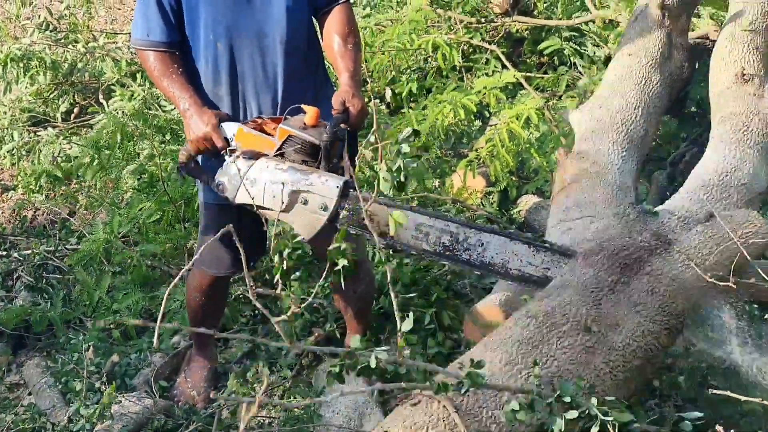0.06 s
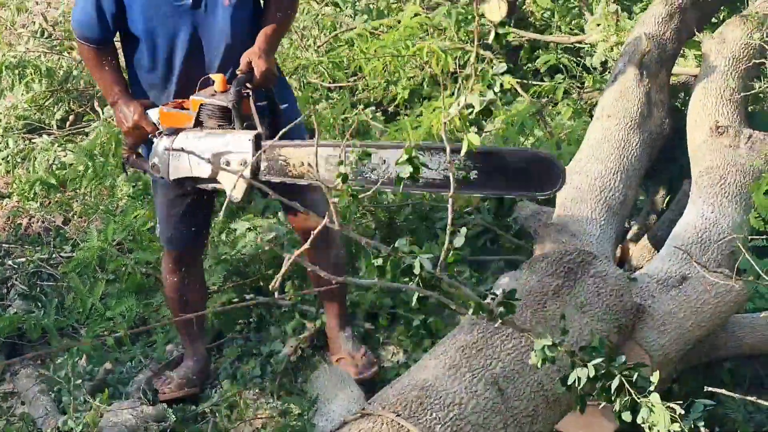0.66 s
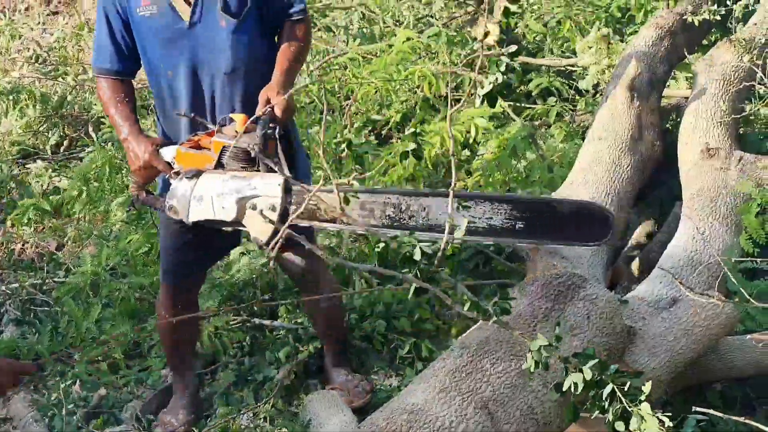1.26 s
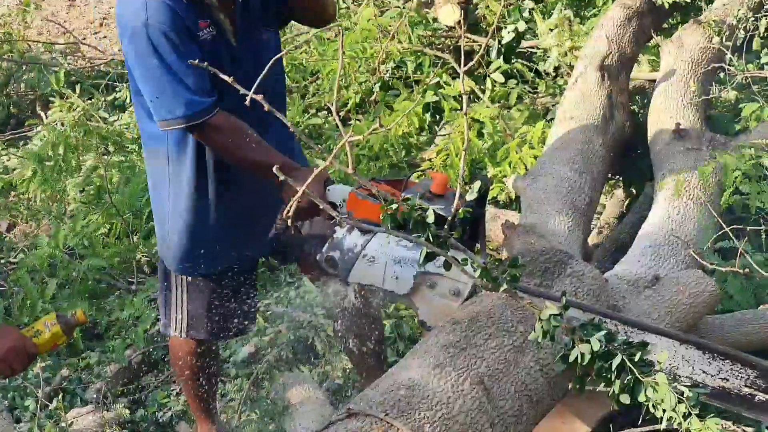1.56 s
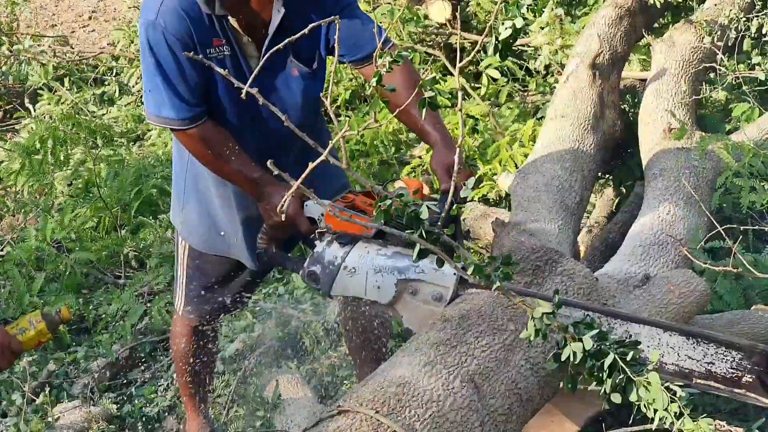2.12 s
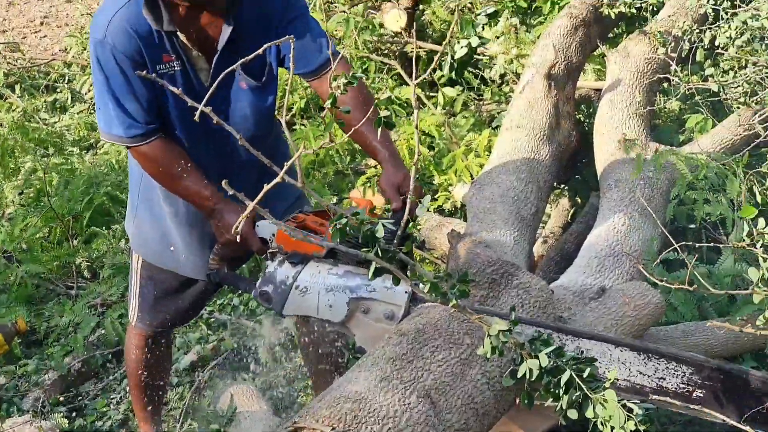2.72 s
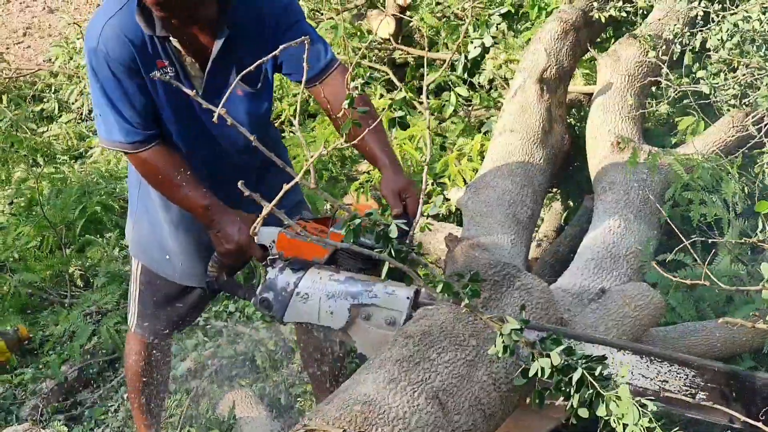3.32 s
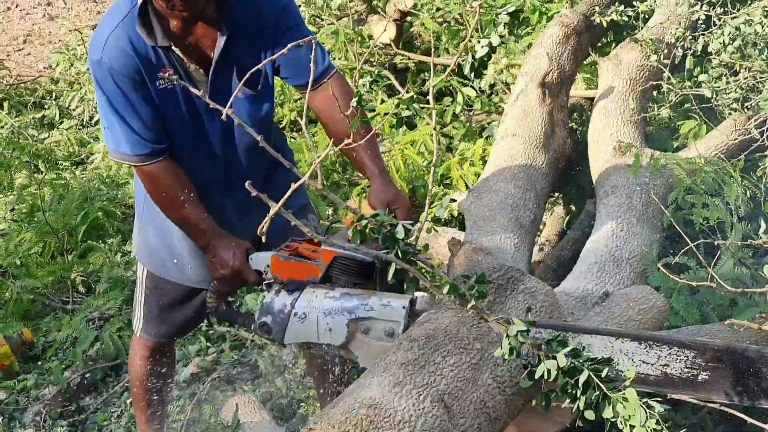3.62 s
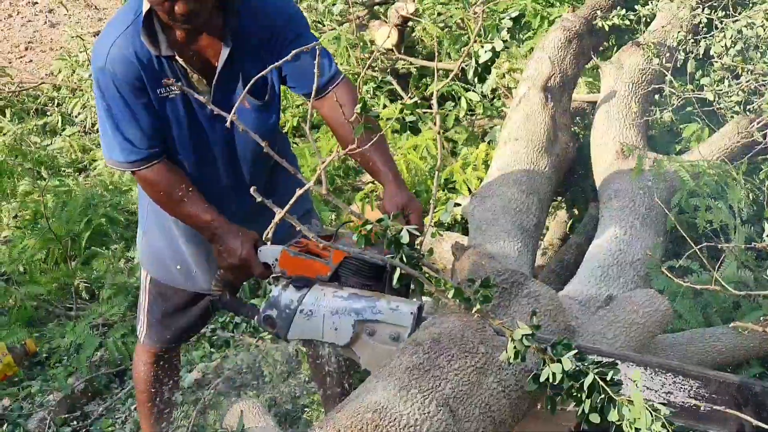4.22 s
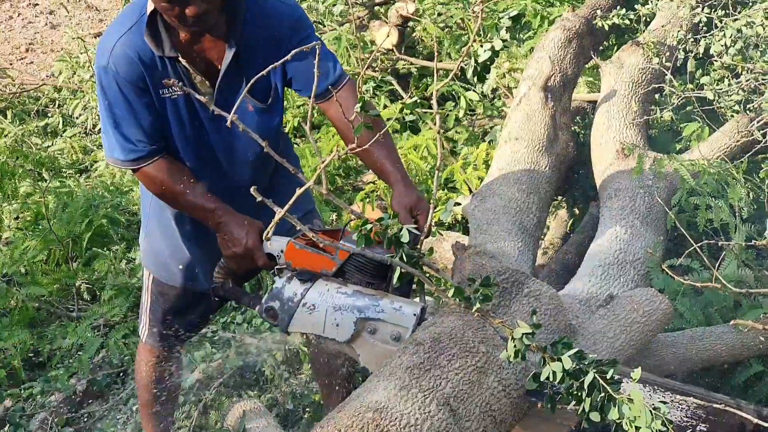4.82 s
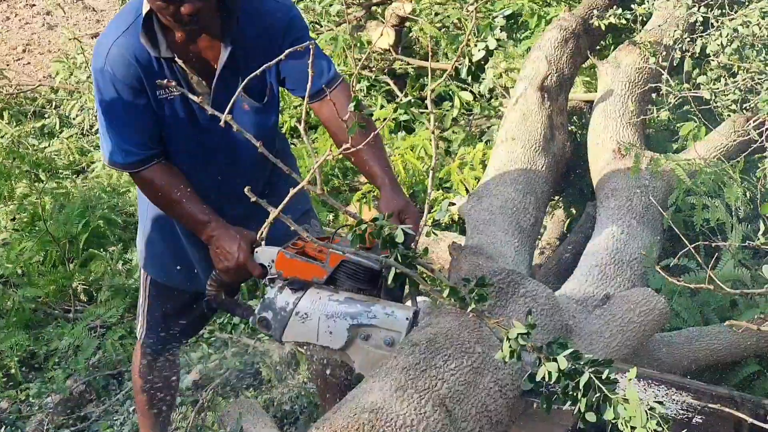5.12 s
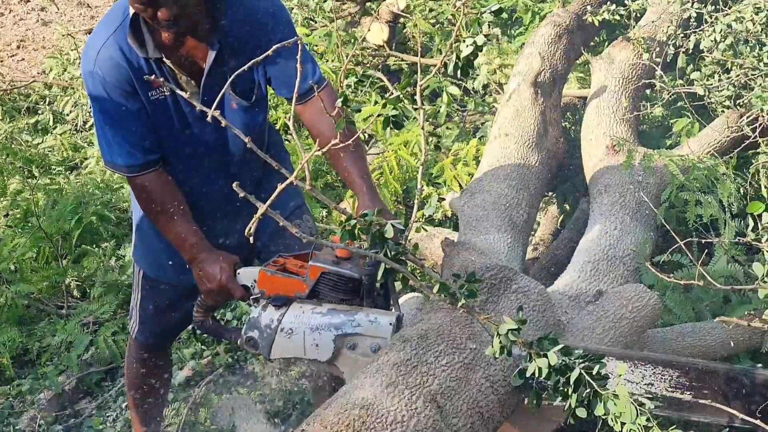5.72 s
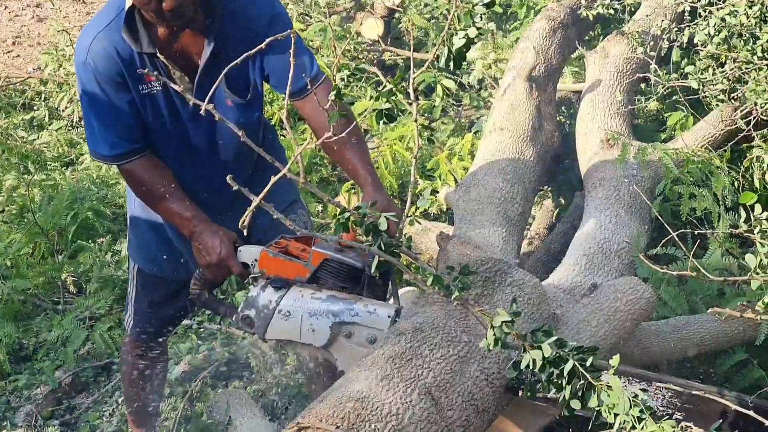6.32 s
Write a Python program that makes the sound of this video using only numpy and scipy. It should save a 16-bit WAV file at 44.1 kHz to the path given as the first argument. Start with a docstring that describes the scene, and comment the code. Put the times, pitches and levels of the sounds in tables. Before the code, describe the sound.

A close two-stroke chainsaw putters and rattles off the throttle, then roars into a tree trunk, sagging and recovering as its teeth rasp.

```python
"""A two-stroke chainsaw, close by outdoors. It leaves one cut and coasts: the engine putters, the casing
clatters, the slack chain slaps the bar. One blip of throttle, then the slowing links zing. At 1.7 s the
throttle opens and the teeth rasp and hiss into a trunk. Firing pulses make the muffler bark and ring;
the engine sags and recovers, the air box honks with each push. The chain scrapes the side of the cut,
its links squeal in spells, and at 4 s the binding bar groans once."""
import sys
import numpy as np
from scipy import signal
from scipy.fft import rfft, irfft, next_fast_len
from scipy.io import wavfile
from scipy.ndimage import map_coordinates

SR = 44100
rng = np.random.default_rng(int(sys.argv[2]) if len(sys.argv) > 2 else 0)


def generate_wav(sig):
    """Save sig (samples, or channels by samples) to the path in sys.argv[1] as 16-bit PCM at SR."""
    pcm = np.round(np.clip(np.atleast_2d(sig).T, -1, 1) * 32767).astype(np.int16)
    wavfile.write(sys.argv[1], SR, pcm)


N = 284886
TIME_S = np.arange(N) / SR


def amp(db):
    """Decibels to gain."""
    return 10 ** (np.asarray(db) / 20)


def unit(x):
    """Scale to rms 1."""
    return x / np.sqrt(np.mean(x ** 2) + 1e-20)


def along(points, hz):
    """Interpolate (freq_hz, value) points on a log axis."""
    freqs_hz, values = np.transpose(points)
    return np.interp(np.log(hz + 1), np.log(freqs_hz + 1), values)


def curves(rows):
    """One value per sample for each column after time_s."""
    times_s, *columns = np.transpose(rows)
    return [np.interp(TIME_S, times_s, column) for column in columns]


def wobble(rate_hz):
    """Smooth random curve, rate_hz knots a second."""
    knots = rng.standard_normal(int(N * rate_hz / SR) + 4)
    return map_coordinates(knots, [TIME_S * rate_hz])


def ramp(centre_s, edge_s):
    """Linear rise from 0 to 1 within edge_s."""
    return np.clip((TIME_S - centre_s) / edge_s + .5, 0, 1)


def held(start_s, end_s, edge_s):
    """Attack, hold, release."""
    return ramp(start_s, edge_s) * (1 - ramp(end_s, edge_s))


def filtered(x, response):
    """x times a complex response of frequency."""
    size = 2 * next_fast_len(N // 2 + SR // 4)
    return irfft(rfft(x, size) * response(np.fft.rfftfreq(size, 1 / SR)), size)[..., :N]


def grounded(x, echo, delay_s=.004022):
    """x combed by its echo off the ground."""
    return filtered(x, lambda hz: 1 + echo * np.exp(-2j * np.pi * hz * delay_s)) / np.hypot(1, echo)


def coloured(x, spectrum, size=8192):
    """x through a minimum-phase body of (freq_hz, gain_db) points, at rms 1."""
    closed = [(spectrum[0][0] / 2, -80), *spectrum, (spectrum[-1][0] * 2, -80)]
    cepstrum = irfft(np.log(amp(along(closed, np.fft.rfftfreq(size, 1 / SR)))))
    body = irfft(np.exp(rfft(2 * cepstrum[:size // 2], size) - cepstrum[0]))[:size // 2]
    return unit(signal.oaconvolve(np.atleast_2d(x), body[None], axes=1)[:, :N])


def ringing(x, modes):
    """x through (freq_hz, width_hz, gain_db) resonances, at rms 1."""
    t = TIME_S[:SR // 20]
    ring = sum((-1) ** k * amp(db) * width * np.exp(-np.pi * width * t) * np.cos(2 * np.pi * hz * t)
               for k, (hz, width, db) in enumerate(modes))
    return unit(signal.oaconvolve(x, ring[None], axes=1)[:, :N])


def narrow(x, hz, half_width_hz):
    """Noise x as a narrow band around a gliding pitch, at rms 1."""
    band = signal.lfilter(*signal.butter(2, half_width_hz, fs=SR), x)
    return unit(band * np.cos(2 * np.pi * np.cumsum(hz) / SR))


def noise(alike=1.0):
    """Stereo white noise with correlation alike."""
    a, b = rng.standard_normal((2, N))
    return np.array([a, alike * a + np.sqrt(1 - alike ** 2) * b])


def pulses(turns, angle_turns, jitter_turns, scatter_db):
    """One pulse a turn at this crank angle, uneven in time and size."""
    count = np.arange(1, int(turns[-1]))
    timing, strength = rng.standard_normal((len(count), 2)).T
    at = np.interp(count + angle_turns + jitter_turns * timing, turns, np.arange(N))
    size, whole, part = amp(scatter_db * strength), at.astype(int), at % 1
    split = np.bincount(whole, size * (1 - part), N + 1)[:N]
    return split + np.bincount(whole + 1, size * part, N + 1)[:N]


def puffs(turns, decay_turns):
    """Gate that opens once a turn and decays, at rms 1."""
    return unit(np.exp(-(turns % 1) / decay_turns))


def harmonic(turns, order):
    """Sinusoid at a multiple of the crank speed, at rms 1."""
    return np.sqrt(2) * np.cos(2 * np.pi * order * turns)


# Crank speed, coasting with one blip: time_s, speed_rps
COAST_SPEED = [(0, 118), (.1, 102), (.3, 92), (.55, 90), (.66, 113), (.77, 122), (1.05, 115), (1.3, 105),
               (1.62, 95)]
# Crank speed under load: time_s, speed_rps
CUT_SPEED = [(1.69, 94.7), (1.99, 87.4), (2.06, 88.3), (2.23, 96.5), (2.35, 99.4), (2.43, 98.9),
             (2.53, 90.5), (2.81, 87.5), (3.08, 86.1), (3.4, 89.2), (3.71, 87.6), (3.81, 89.2),
             (3.92, 88.8), (4.08, 85.9), (4.29, 85.9), (4.39, 84.3), (4.55, 86.1), (4.76, 84.7),
             (4.9, 79.6), (5.05, 79.6), (5.26, 87.3), (5.48, 88.5), (5.52, 90.0), (5.79, 93.7),
             (5.87, 92.9), (6.46, 95.7)]

def crankshaft(waver=.003):
    """Nominal speed, and turns made at a slightly wavering speed."""
    speed_rps, = curves([*COAST_SPEED, *CUT_SPEED])
    return speed_rps, np.cumsum(speed_rps * (1 + waver * wobble(25))) / SR


def shaking(turns, speed_rps, cutting, depth=1, taut_rps=116):
    """Gain jolted every second turn: slight in wood, deeper as the free chain slows and slackens."""
    slack = .11 * cutting + .0078 * (1 - cutting) * (taut_rps - speed_rps)
    jolts = puffs(turns / 2, decay_turns=.2) - 1
    return 1 + np.clip(depth * slack, 0, 1) * jolts


# Outdoor rumble: freq_hz, gain_db
AIR_SPECTRUM = [(25, -26), (45, -2), (75, -1), (130, 14), (200, 4), (300, 7), (1000, -71)]

def air(level_db=-74):
    """Faint rumble, independent in each channel."""
    return amp(level_db) * coloured(rng.standard_normal((2, N)), AIR_SPECTRUM)


# Coasting engine: freq_hz, gain_db
PUTTER_SPECTRUM = [(60, -8), (95, -7), (145, -5), (210, -14), (310, -3.5), (450, -3), (600, 10.5),
                   (750, 10), (950, 3), (1800, -3)]
# Its low chug: freq_hz, gain_db
CHUG_SPECTRUM = [(55, -9), (80, -1), (150, -1), (205, -14), (290, 5), (360, 2.5), (440, -6)]

def putter(pumping, cutting, blip, fade_db_per_s=1):
    """Pumping pulses, louder in wood; their low chug dies after the blip."""
    level_db = -45 + 6 * cutting + 4 * blip - fade_db_per_s * TIME_S
    chug = amp(-52 + 5 * cutting) * (1 - ramp(.69, edge_s=.14)) * coloured(pumping, CHUG_SPECTRUM)
    return amp(level_db) * coloured(pumping, PUTTER_SPECTRUM) + chug


# Muffler, coasting: freq_hz, gain_db
COAST_BARK_SPECTRUM = [(560, -20), (730, 3.5), (860, 3.5), (1400, -7), (1700, 3), (1950, 8.5), (2250, -8)]

def coasting_bark(pumping, speed_rps, db_per_rps=.5):
    """The muffler barks while the engine still spins fast."""
    return amp(-39 + db_per_rps * (speed_rps - 117.5)) * coloured(pumping, COAST_BARK_SPECTRUM)


# Casing: freq_hz, gain_db
CASING_SPECTRUM = [(500, -0.5), (850, -10), (1060, 5), (1150, 9.5), (1260, -7), (1400, -4), (1750, -8),
                   (2050, 14), (2330, -10), (2560, 15), (2800, -13.5), (3100, 12), (3550, -49), (4300, -17)]
# Clutch drum: freq_hz, width_hz, gain_db
DRUM_MODES = [(1144, 25, 2), (2850, 88, 3.5)]

def clatter(turns, shake, cutting, fade_db_per_s=4.5):
    """Rough noise and a tick a turn rattle the casing and briefly ring the clutch drum."""
    ticks = .35 * unit(pulses(turns, 0, jitter_turns=.005, scatter_db=2.5))
    knocks = (noise(alike=.96) * amp(3.2 * wobble(300)) + ticks) * shake
    casing = amp(-35.5 + 7 * cutting - fade_db_per_s * TIME_S) * coloured(knocks, CASING_SPECTRUM)
    drum = amp(-34.5) * held(.15, .56, edge_s=.089) * ringing(knocks, DRUM_MODES)
    return casing + drum


def chain_pull(turns, shake, throttle):
    """Gain of the chain's friction: teeth bite in uneven bursts and every firing jerks the chain on."""
    bursts = 1.17 * np.tanh(wobble(65) / 2) + .18 * wobble(170)
    bite = amp((2.115 + .086 * throttle) * bursts)
    jerks = 1 + .044 * puffs(turns, decay_turns=.97)
    grain = amp(.5 * wobble(1400))
    return bite * shake * jerks * grain


# Bite of the teeth in wood: time_s, gain_db
BITE_GAIN = [(0, 1.5), (.12, -1), (1.7, 1), (2.18, -1), (2.42, 1), (2.55, -3), (2.66, -0.5), (2.77, 1),
             (2.88, -1.5), (3.3, 0.5), (3.8, 0.5), (4.25, 1), (4.52, 0.5), (4.9, 1), (5.6, 0.5),
             (6.46, 1.5)]
# Rasp of the teeth: freq_hz, gain_db
RASP_SPECTRUM = [(300, -23), (700, -13), (1100, -14), (1550, -11), (2080, -5), (2330, -2.5), (2600, -1),
                 (3300, 0.3), (4000, -1.5), (4550, -1), (4850, 4), (5250, 1), (5700, 1.5), (7100, -0.5),
                 (7800, -10.5), (11000, -28.5)]
# Hiss of chips and links: freq_hz, gain_db
HISS_SPECTRUM = [(5000, -15), (7800, -5), (9700, -6.5), (11200, 0.5), (13000, -2), (15600, -1.5)]
# Chain running in air: time_s, bar_ring_db, link_hiss_db
FREE_CHAIN_LEVELS = [(.17, -27, -40), (.3, -33.5, -40), (.49, -30, -41), (.58, -25, -35), (.77, -26, -33.5),
                     (.85, -23.5, -31), (.96, -27, -31.5), (1.1, -29, -31.5), (1.33, -26.5, -36),
                     (1.46, -24, -35), (1.65, -24.5, -33.5)]
# Steel guide bar: freq_hz, width_hz, gain_db
GUIDE_BAR_MODES = [(1192, 164, 3), (2540, 91, 12), (3000, 410, 8.5), (4890, 160, 13), (5410, 130, 12),
                   (5790, 255, 12.5), (6380, 1200, 5)]

def chain(pull, cutting, push_db):
    """Teeth rasp and hiss, louder in wood; the bar rings steadily in the cut and in surges in air."""
    bite_db, = curves(BITE_GAIN)
    free_ring_db, free_hiss_db = curves(FREE_CHAIN_LEVELS)
    free = 1 - cutting
    waver_db = .5 * wobble(14)
    rasp_db = cutting * (-20 + bite_db - .023 * push_db) - 29.5 * free + waver_db
    hiss_db = cutting * (-27.5 + .42 * bite_db) + free * free_hiss_db + waver_db
    ring_db = -27 * cutting + free * (free_ring_db + 2 * wobble(21.94))
    rasp = amp(rasp_db) * coloured(noise(alike=.6) * pull, RASP_SPECTRUM)
    hiss = amp(hiss_db) * coloured(noise(alike=.027) * pull, HISS_SPECTRUM)
    bar = amp(ring_db) * ringing(noise(alike=.21) * pull, GUIDE_BAR_MODES)
    return grounded(rasp + hiss, echo=.22) + bar


# Chain slaps: start_s, relative_db, hold_s
SLAP_HITS = [(0.1483, -11.5, 0.0047), (0.2727, -27, .004), (0.319, -15, .003), (0.35, -14, 0.0032),
             (0.4006, -14.5, 0.0081), (0.425, -10, 0.0012), (0.4466, -14, 0.0057), (0.511, -16.5, 0.011),
             (0.588, -11, .001), (0.606, -12, 0.0035), (0.658, -7.5, 0.0019), (0.825, -15.5, 0.0089),
             (1.467, -14.5, .006), (1.493, -25, 0.0026), (1.613, -9, 0.0036), (1.6568, -6.5, 0.0029)]
# Struck bar: freq_hz, gain_db
SLAP_SPECTRUM = [(400, -11.5), (1150, -7.5), (1700, -14), (3150, 1), (4200, -7), (5400, 4.5), (6800, -9),
                 (8500, -18), (15000, -10.5)]

def slaps(level_db=-7, attack_s=.00089, t60_s=.017):
    """The slack chain strikes the bar: a short rattle of links that holds, then dies."""
    envelope = np.zeros(N)
    for start_s, relative_db, hold_s in SLAP_HITS:
        age_s = np.maximum(TIME_S - start_s, 0)
        decay_db = 60 * np.maximum(age_s - hold_s, 0) / t60_s
        envelope += amp(level_db + relative_db - decay_db) * (1 - np.exp(-age_s / attack_s))
    return envelope * coloured(noise(alike=.098), SLAP_SPECTRUM)


# Intake: freq_hz, gain_db
GULP_SPECTRUM = [(200, -20), (280, -5), (430, -4), (700, -13), (1050, 14), (1300, -20), (1900, -18)]

def gulp(pumping, blip):
    """The intake gulps air during the blip."""
    return amp(-38) * blip * coloured(pumping, GULP_SPECTRUM)


def coasting_engine(turns, speed_rps, cutting):
    """Throttle shut but for one blip: soft pumping pulses and clatter."""
    blip = held(.63, .69, edge_s=.089)
    shake = shaking(turns, speed_rps, cutting, depth=2.3)
    pumping = unit(pulses(turns, 0, jitter_turns=.005, scatter_db=2)) + .55 * noise()
    return (putter(pumping * shake, cutting, blip) + coasting_bark(pumping, speed_rps)
            + clatter(turns, shake, cutting) + gulp(pumping, blip))


# Zings of the free links: start_s, end_s, level_db, first_hz, last_hz
ZING_SWELLS = [(0.896, 1.077, -37, 11500, 10600), (1.187, 1.348, -38, 11000, 10900)]
# The bar's lower answer: freq_hz, width_hz, gain_db
ZING_BAR_MODES = [(1970, 77, -1), (2090, 110, -5), (3120, 120, 5)]

def zings(shake):
    """The slowing links sing on the bar in short swells of falling pitch."""
    out = np.zeros((2, N))
    for start_s, end_s, level_db, first_hz, last_hz in ZING_SWELLS:
        pitch_hz = first_hz + (last_hz - first_hz) * ramp((start_s + end_s) / 2, end_s - start_s)
        rub = noise(alike=.5) * shake
        zing = narrow(rub, pitch_hz, half_width_hz=560) + amp(2.5) * ringing(rub, ZING_BAR_MODES)
        out += amp(level_db) * held(start_s, end_s, edge_s=.05) * zing
    return out


# Lowest engine orders: order, base_db
THUMP_ORDERS = [(1, -50), (2, -58), (3, -48.5)]

def thump(turns, push_db):
    """Low beat of the firing, uneven from turn to turn."""
    orders = sum(amp(base_db + .43 * push_db + 2 * wobble(13)) * harmonic(turns, order)
                 for order, base_db in THUMP_ORDERS)
    return orders * amp(.8 * wobble(70))


# Air box: freq_hz, gain_db
AIRBOX_SPECTRUM = [(285, -29.5), (350, 5), (440, 5), (505, 12), (565, 15), (605, 13), (660, 7), (760, 14)]

def airbox(turns, flow, push_db):
    """Pulsed flow honks in a push; one order sings while it lies on the resonance."""
    honk = amp(-36 + .93 * push_db) * coloured(flow, AIRBOX_SPECTRUM)
    tone = amp(-45 + 1.3 * push_db) * coloured(harmonic(turns, order=6), AIRBOX_SPECTRUM)
    return grounded(honk, echo=.12) + tone


# Muffler, throttle open: freq_hz, gain_db
EXHAUST_SPECTRUM = [(260, -16.5), (330, -19.5), (540, -12.5), (630, 13), (700, 16.5), (820, 11), (930, -1),
                    (1040, 0.5), (1150, -2.5), (1320, 11.5), (1480, -8.5), (1900, -21.5)]
# Clean upper exhaust orders: order, base_db
BUZZ_ORDERS = [(10, -65), (11, -50), (12, -45)]

def exhaust(turns, firing, gas, push_db, racing, bog):
    """The muffler barks, weaker and rougher when bogged; its buzz stands out when racing."""
    rough_flow = firing + (.23 + .2 * bog) * gas
    bark_db = -31.5 + .42 * push_db - 1.5 * racing - 3 * bog
    bark = amp(bark_db) * coloured(rough_flow, EXHAUST_SPECTRUM)
    buzz = sum(amp(base_db + 4 * racing + .32 * push_db + 1.5 * wobble(9.2)) * harmonic(turns, order)
               for order, base_db in BUZZ_ORDERS)
    return grounded(bark, echo=.12) + buzz


# Exhaust port opening: freq_hz, gain_db
CRACK_SPECTRUM = [(1500, -32), (1750, -18), (1900, -3), (2080, -21.5), (2380, 15.5), (3050, -3.5),
                  (3600, -8), (5000, -12), (8000, -24)]

def port_crack(edges, depth):
    """The exhaust port cracks open, a little softer deep in the cut."""
    return amp(-29 - 2 * depth) * coloured(edges, CRACK_SPECTRUM)


# Muffler shell, early in the cut: freq_hz, width_hz, gain_db
SHELL_EARLY_MODES = [(1841, 77, 0.5), (2277, 61, 3), (2406, 29, 1), (2774, 57, 2)]
# Shell, deep in the cut: freq_hz, width_hz, gain_db
SHELL_DEEP_MODES = [(1713, 53, -2.5), (2086, 260, -6.5), (2317, 60, 2.5), (2520, 205, 2.5), (2792, 88, 3.5)]
# Strength of the shell's rings: time_s, low_gain_db, upper_gain_db
SHELL_GAINS = [(1.72, -34, -21), (2.19, -35.5, -16.5), (2.27, -38, -22.5), (3.49, -34, -21),
               (3.56, -31, -20), (4.01, -32, -21.5), (4.07, -35, -22.5), (4.77, -34, -23),
               (4.98, -28.5, -26.5), (5.2, -33, -25.5), (5.31, -29.5, -23.5), (5.81, -33, -26),
               (5.91, -31, -22), (5.94, -34, -29.5), (6.06, -34, -20), (6.12, -30.5, -26),
               (6.41, -30, -26.5), (6.44, -32, -30)]
# Band of the low ring: freq_hz, gain_db
SHELL_LOW_BAND = [(1450, -37), (1680, -0.5), (1930, -3.5), (2060, -24.5)]
# Band of the upper rings: freq_hz, gain_db
SHELL_UPPER_BAND = [(2030, -28), (2250, -7.5), (2900, 1), (3400, -17), (6000, -18)]

def muffler_shell(fronts, depth):
    """Steep pulse fronts ring the steel shell; two sets of modes crossfade with depth."""
    early = np.sqrt(1 - depth) * ringing(fronts, SHELL_EARLY_MODES)
    steel = early + np.sqrt(depth) * ringing(fronts, SHELL_DEEP_MODES)
    low_db, upper_db = curves(SHELL_GAINS)
    low = amp(low_db + 2.2) * coloured(steel, SHELL_LOW_BAND)
    return low + amp(upper_db - 2.35) * coloured(steel, SHELL_UPPER_BAND)


# Engine cover: freq_hz, width_hz, gain_db
COVER_MODES = [(1342, 61, 0)]

def cover(fronts, depth):
    """Pulse fronts ring the cover deep in the cut."""
    return amp(-37) * np.sqrt(depth) * ringing(fronts, COVER_MODES)


# Depth of the cut: time_s, depth_fraction
CUT_DEPTH = [(1.7, 0.04), (3.4, 0.01), (3.65, 0.58), (5.0, 0.68), (5.6, 0.92), (6.46, 1)]

def loaded_engine(turns, speed_rps, push_db, jitter_turns=.0015):
    """Throttle open: each turn gives a sharp pulse and a weaker one as the piston comes back."""
    depth, = curves(CUT_DEPTH)
    racing = np.interp(speed_rps, [92, 98], [0, 1])
    bog = np.interp(speed_rps, [80, 86], [1, 0])
    # a pulse half a turn later favours the even orders
    half = (.11 + .12 * racing) * pulses(turns, .5, jitter_turns, scatter_db=2.5)
    firing = unit(pulses(turns, 0, jitter_turns, scatter_db=.7) + half)
    gas = noise() * puffs(turns, decay_turns=.3)
    # the steep edges vary more than the pulses
    back = .18 * pulses(turns, .37, 2 * jitter_turns, scatter_db=4)
    edges = unit(pulses(turns, 0, jitter_turns, scatter_db=1) + back)
    fronts = edges + (.08 + .42 * depth) * gas
    return (thump(turns, push_db) + airbox(turns, firing + .1 * gas, push_db)
            + exhaust(turns, firing, gas, push_db, racing, bog)
            + port_crack(edges, depth) + muffler_shell(fronts, depth) + cover(fronts, depth))


# Pushes on the saw: start_s, end_s, push_db
PUSH_SPANS = [(1.783, 1.96, 6), (2.15, 2.438, 2), (2.47, 2.678, 7), (2.753, 3.2, -3), (3.526, 3.716, 4.5),
              (3.85, 4.01, 5.5), (4.48, 4.867, 6.5), (4.917, 5.3, -1.5), (5.407, 6.45, 5)]

def pushes(edge_s=.059):
    """Drive in dB: above 0 the honk swells, below 0 it sinks as the engine bogs."""
    return sum(push_db * held(start_s, end_s, edge_s) for start_s, end_s, push_db in PUSH_SPANS)


# Scraped bar: freq_hz, width_hz, gain_db
SCRAPE_BAR_MODES = [(3280, 270, -0.5), (5740, 120, 5), (6200, 350, -1), (6750, 300, -1)]

def scrape(pull, start_s=2.26, end_s=2.47):
    """The fast chain scrapes the side of the cut and the bar shrills."""
    shrill = ringing(noise(alike=.45) * pull, SCRAPE_BAR_MODES)
    return amp(-21) * held(start_s, end_s, edge_s=.058) * shrill


# Spells of hard rubbing: start_s, end_s, level_db, lowest_hz
SQUEAL_SPELLS = [(2.664, 3.365, -28, 14650), (4.08, 5.557, -31.5, 14700), (5.916, 7.002, -29.5, 14700)]

def squeal(pull, light_db=-35, light_hz=15250):
    """Links squeal on the bar, faint and high until harder rubbing swells the band and bends it down."""
    gain, pitch_hz = amp(light_db), light_hz
    for start_s, end_s, level_db, lowest_hz in SQUEAL_SPELLS:
        gain += (amp(level_db) - amp(light_db)) * held(start_s, end_s, edge_s=.1)
        progress = ramp((start_s + end_s) / 2, end_s - start_s)
        pitch_hz += (lowest_hz - light_hz) * np.sqrt(np.abs(np.sin(np.pi * progress)))
    band = narrow(noise(alike=.35) * pull, pitch_hz, half_width_hz=450)
    return grounded(gain * amp(2 * wobble(12)) * band, echo=.8)


def groan(start_s=4.022, end_s=4.078, level_db=-33, first_hz=620, last_hz=668):
    """The bar binds in the cut and sings one short rising note."""
    pitch_hz = first_hz + (last_hz - first_hz) * ramp((start_s + end_s) / 2, end_s - start_s)
    note = np.sqrt(2) * np.sin(2 * np.pi * np.cumsum(pitch_hz) / SR)
    return amp(level_db) * held(start_s, end_s, edge_s=.034) * note


# Likeness of the channels: freq_hz, correlation
STEREO_LIKENESS = [(60, .96), (500, .98), (1000, .85), (2200, .82), (4000, .62), (8000, .42), (13000, .5)]
# Balance: freq_hz, left_minus_right_db
STEREO_TILT = [(60, -17), (120, -13), (240, -13.5), (480, -14.5), (950, -15), (1890, -10), (3770, -10.5),
               (7520, -8.5), (15000, -5)]
# Phase: freq_hz, left_lead_rad
STEREO_LEAD = [(0, 1.2), (260, 1.5), (1600, 1.4), (2580, 1.7), (4310, 2.5), (5500, 4.0), (11700, 8.1),
               (16000, 10.9)]
# Movement of the saw: time_s, extra_left_minus_right_db
STEREO_DRIFT = [(0, 2.5), (.5, 1.5), (1.3, 0.5), (1.8, 4), (5, 3.5), (6.46, 4.5)]

def stereo(pair):
    """The saw is earlier on the left, louder on the right, and drifts as it moves."""
    def response(hz):
        left = amp(along(STEREO_TILT, hz))
        lead_rad = np.interp(hz, *np.transpose(STEREO_LEAD))
        cross = 2 * left * along(STEREO_LIKENESS, hz) * np.cos(lead_rad)
        centre = np.sqrt(left ** 2 + 1 + cross) / 2  # keeps the channel sum flat
        return np.array([left * np.exp(1j * lead_rad), np.ones_like(hz)]) / centre
    drift_db, = curves(STEREO_DRIFT)
    return filtered(pair, response) * amp(np.array([drift_db, -drift_db]) / 2)


def scene(leave_s=.14, open_s=1.683):
    """One crankshaft drives engine and chain, out of one cut and into the next."""
    speed_rps, turns = crankshaft()
    throttle = ramp(open_s, edge_s=.0098)
    cutting = throttle + 1 - ramp(leave_s, edge_s=.041)
    push_db = pushes()
    shake = shaking(turns, speed_rps, cutting)
    pull = chain_pull(turns, shake, throttle)
    coasting = (1 - throttle) * coasting_engine(turns, speed_rps, cutting)
    links = chain(pull, cutting, push_db) + slaps() + zings(shake)
    loaded = throttle * (loaded_engine(turns, speed_rps, push_db) + squeal(pull))
    return air() + stereo(coasting + links + loaded + scrape(pull) + groan())


def record(dry, top_hz=15850):
    """Clip at full scale, then cut everything above top_hz."""
    return filtered(np.clip(dry, -1, 1), lambda hz: hz < top_hz)


dry = scene()
out = record(dry)
generate_wav(out)
```